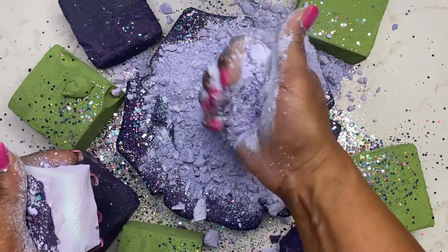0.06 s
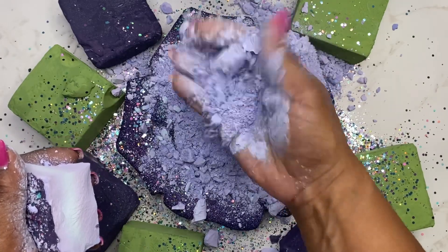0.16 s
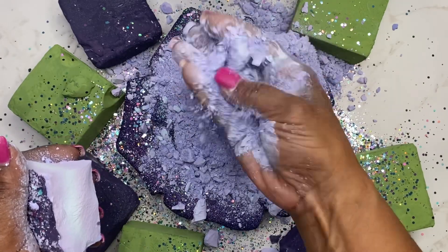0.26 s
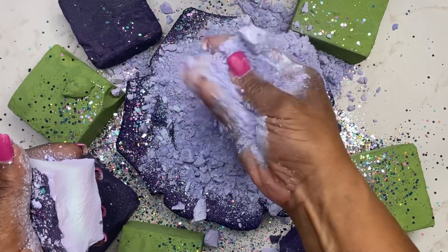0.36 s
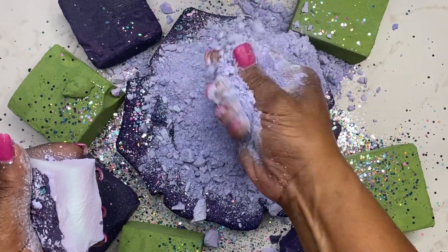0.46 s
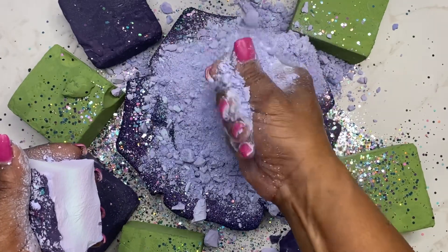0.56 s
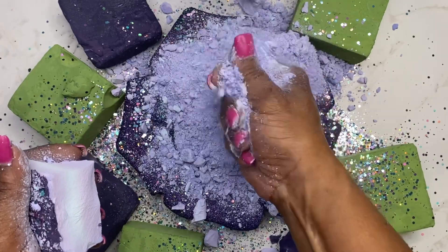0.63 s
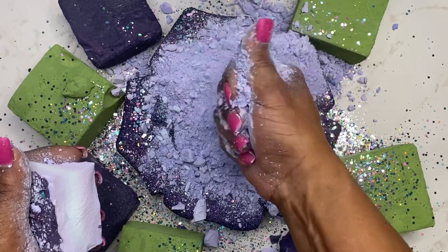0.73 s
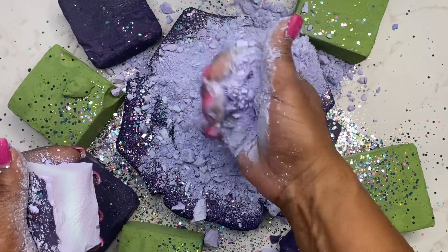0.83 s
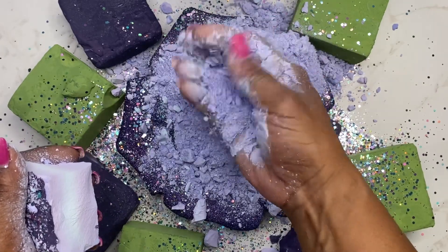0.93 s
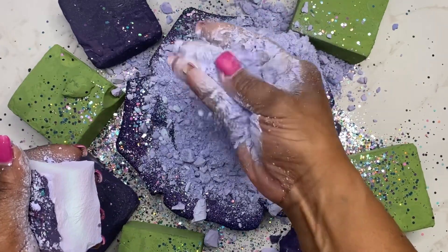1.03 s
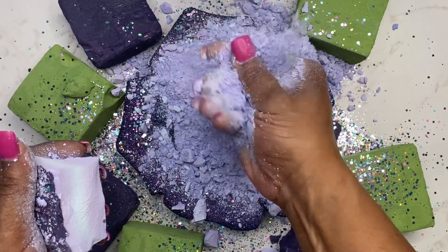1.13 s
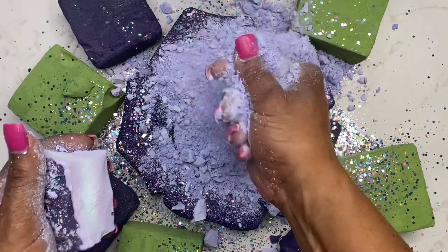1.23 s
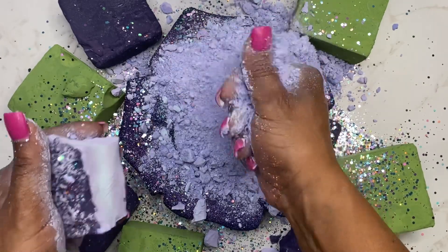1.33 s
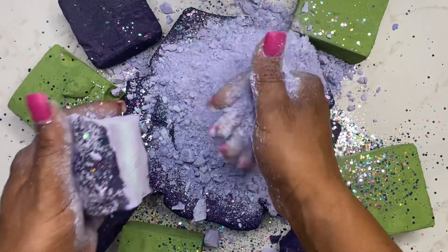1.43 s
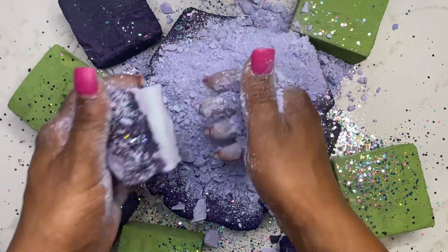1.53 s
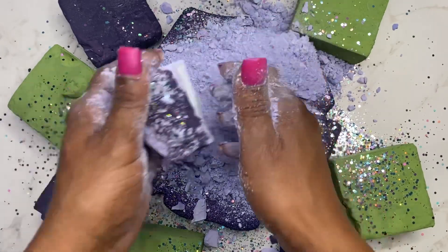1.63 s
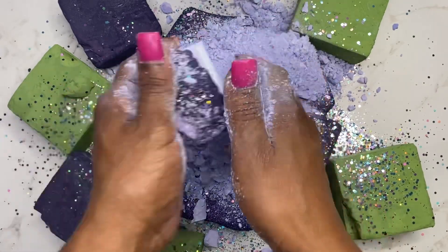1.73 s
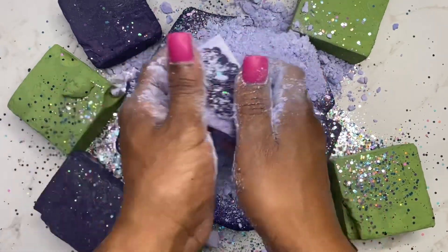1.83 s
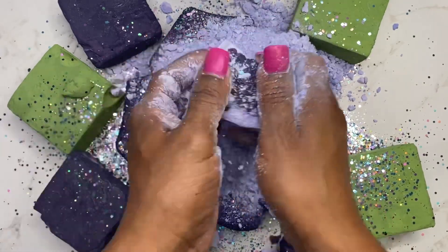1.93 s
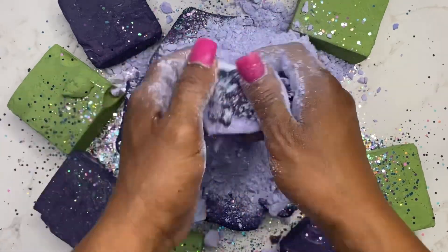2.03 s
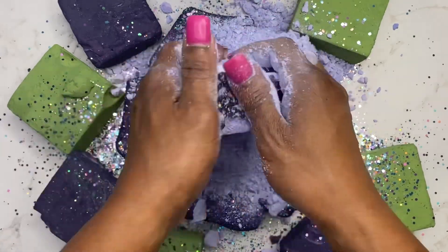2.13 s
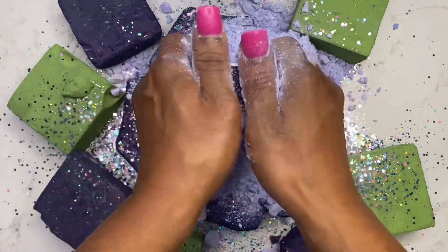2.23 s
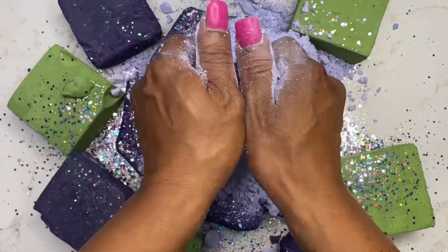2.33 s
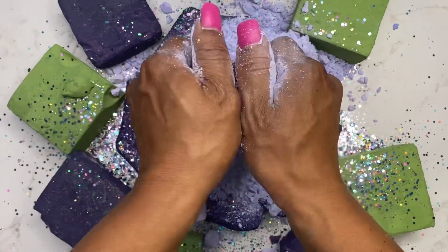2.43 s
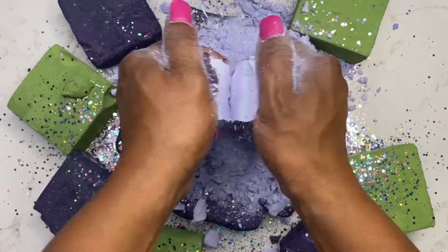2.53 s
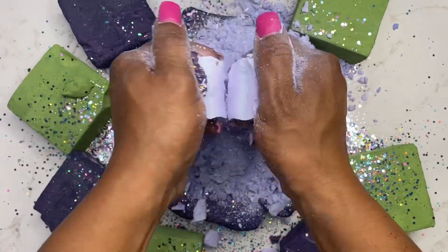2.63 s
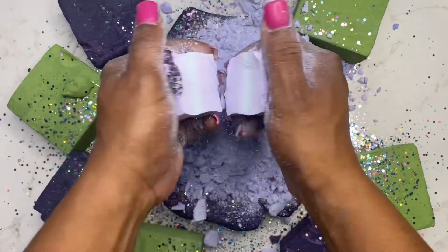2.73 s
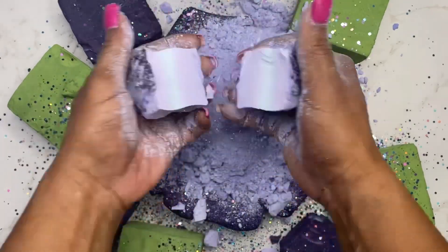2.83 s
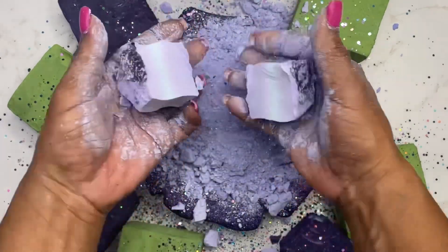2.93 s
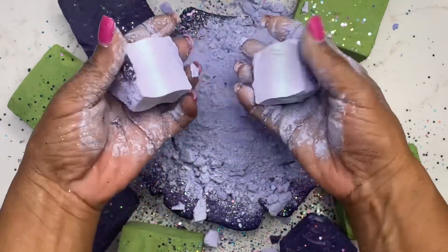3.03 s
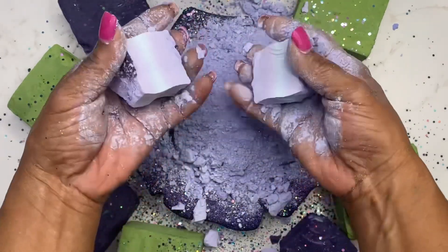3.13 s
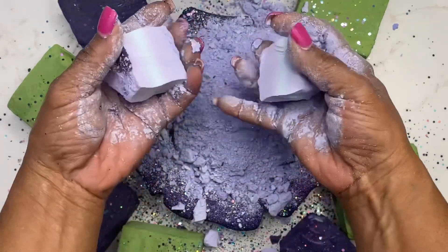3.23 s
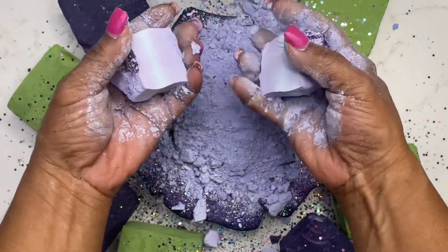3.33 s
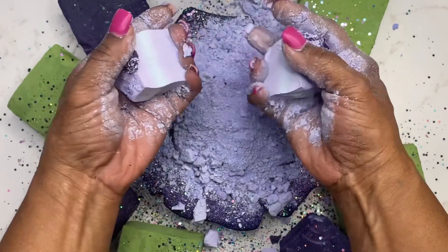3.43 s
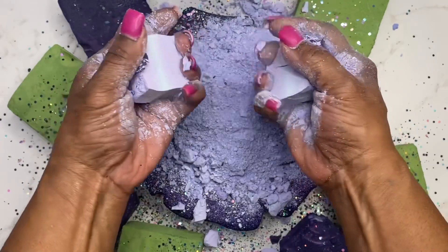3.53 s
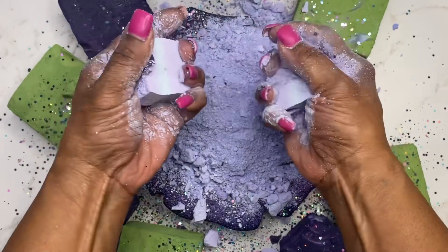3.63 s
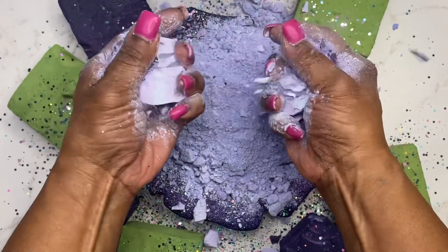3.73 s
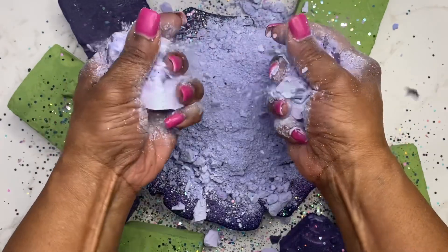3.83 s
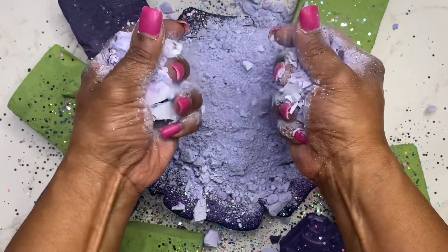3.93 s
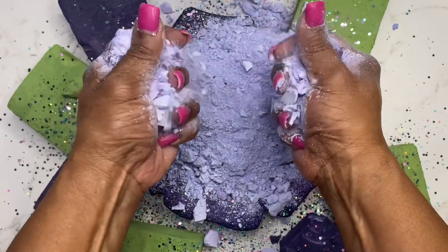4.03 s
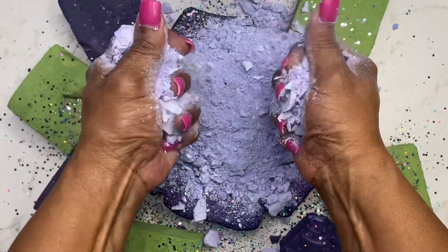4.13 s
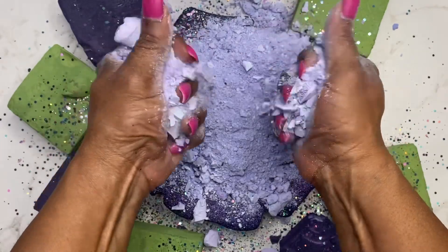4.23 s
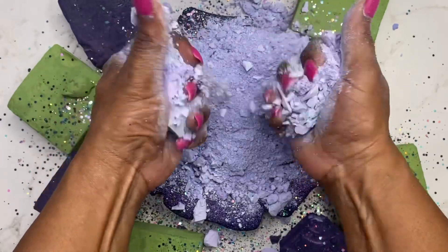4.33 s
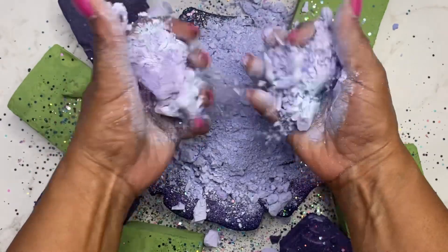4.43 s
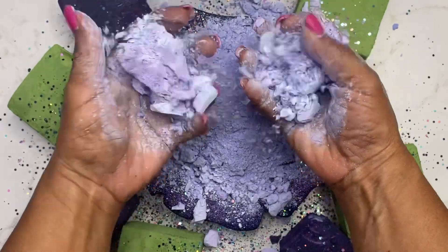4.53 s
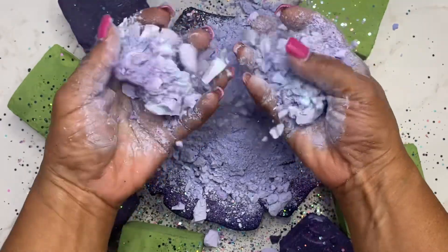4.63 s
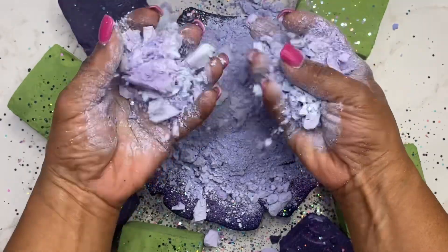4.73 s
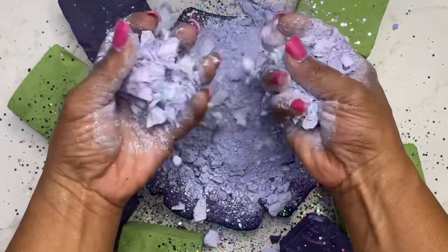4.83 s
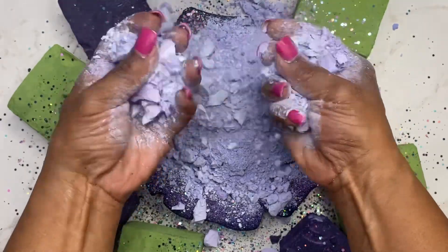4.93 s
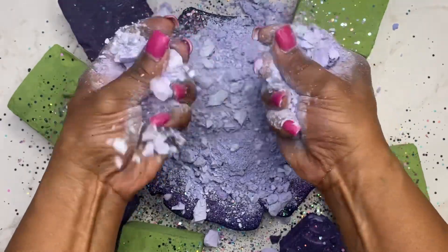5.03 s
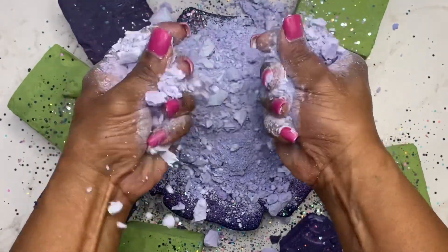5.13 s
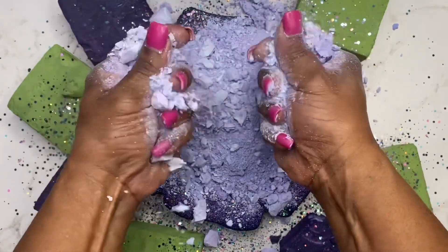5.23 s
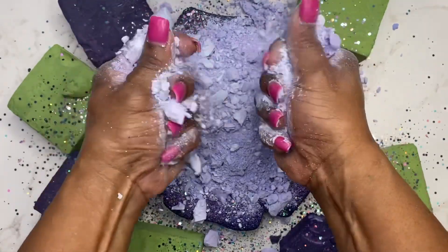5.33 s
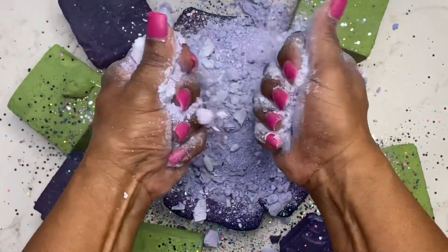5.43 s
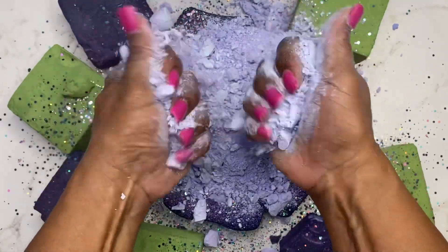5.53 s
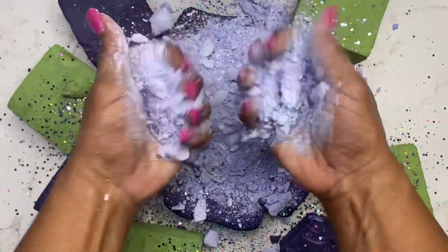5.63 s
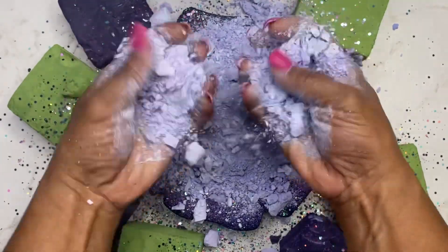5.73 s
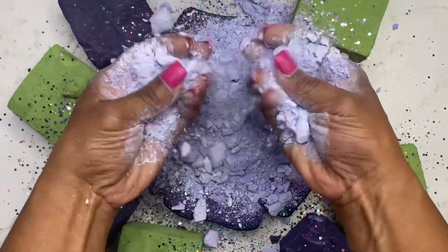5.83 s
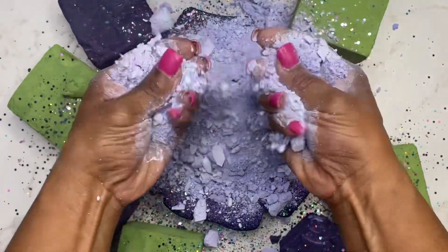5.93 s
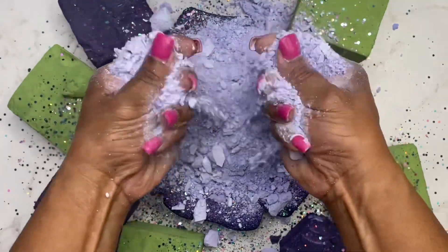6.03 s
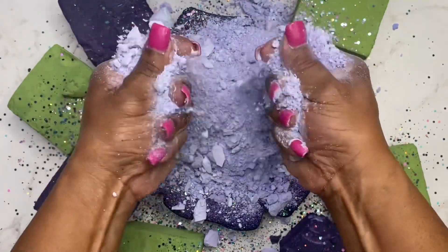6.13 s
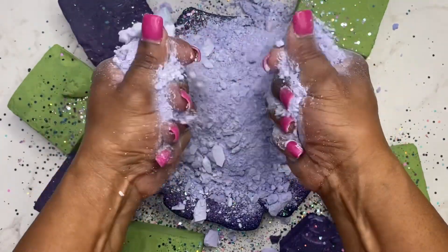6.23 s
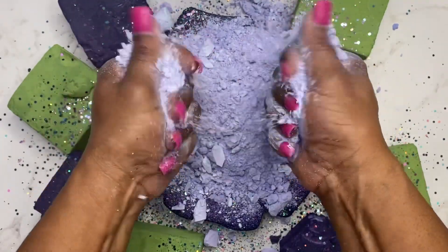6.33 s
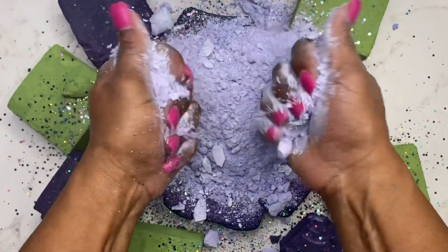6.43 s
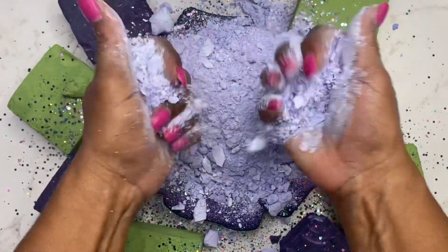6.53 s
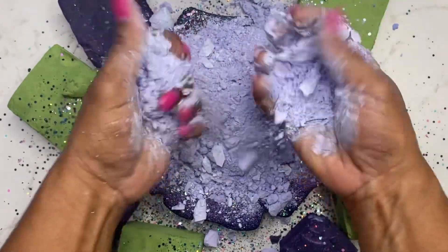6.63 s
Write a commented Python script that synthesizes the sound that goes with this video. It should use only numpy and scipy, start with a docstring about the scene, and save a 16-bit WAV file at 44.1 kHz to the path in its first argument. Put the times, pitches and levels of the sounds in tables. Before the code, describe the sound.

Hands crush dry chalk very close to the microphone in a small quiet room with faint steady hush. Soft gritty squeezes and small cracks come first, then dry skin rubs a block with bright scrapes. It snaps sharply in two, followed by quieter sliding and flaking ticks. A violent volley of cracks and muffled palm thumps follows, loosening into crumbly grinding.

```python
"""Crushing dry chalk

Two hands crush blocks of dry chalk close to the microphone in a small room, over a steady hush.
Crumbs crunch as clumped, ringing grains; a rubbed block sings through resonances and snaps in two.
Both halves then collapse in a volley of cracks, each a dying avalanche of tiny breaks.
Thuds are decaying sines, kneading is more grains; the loudest cracks overload and clip."""
import sys
import numpy as np
from scipy import signal
from scipy.fft import rfft, irfft
from scipy.io import wavfile
from scipy.ndimage import uniform_filter1d

SR = 44100
rng = np.random.default_rng(int(sys.argv[2]) if len(sys.argv) > 2 else 0)


def transcribe(u):
    """Save the signal u as a 16-bit wav file named by the first command-line argument.

    u: samples, shape (n,) or (channels, n), limited to [-1, 1]; the rate is SR.
    q: integer samples, one column per channel.
    """
    v = np.clip(np.atleast_2d(u).T, -1, 1)
    q = np.round(v * 32767).astype(np.int16)
    wavfile.write(sys.argv[1], SR, q)


N = 294147


def from_db(db):
    """Decibels to gain."""
    return 10 ** (np.asarray(db) / 20)


def rms_one(x):
    """Scale to unit rms."""
    return x / np.sqrt(np.mean(x ** 2) + 1e-20)


def fade(size, t60):
    """Exponential decay, 60 dB down after t60 seconds."""
    return np.exp(-np.log(1000) * np.arange(size) / (t60 * SR))


def drift(rate):
    """Slow random wander: straight lines between normal random points, rate points per second."""
    points = rng.standard_normal(N // 20)
    return np.interp(np.arange(N) * rate / SR, np.arange(len(points)), points)


def colour(x, spectrum, size=4096):
    """Causal (minimum-phase) filter that follows (Hz, dB) points."""
    hz, db = np.transpose(spectrum)
    grid = np.maximum(np.fft.rfftfreq(size, 1 / SR), 1)
    curve_db = np.interp(np.log(grid), np.log(hz), db)
    # folding the cepstrum forward in time gives minimum phase
    cepstrum = irfft(np.log(from_db(curve_db)))
    cepstrum[1:size // 2] *= 2
    cepstrum[size // 2 + 1:] = 0
    impulse = irfft(np.exp(rfft(cepstrum)))
    return signal.fftconvolve(x, impulse)[:len(x)]


def resonate(x, hz, q):
    """One resonance with gain 1 at its peak."""
    hz = min(hz, SR / 3)
    w = 2 * np.pi * hz / SR
    damp = np.sin(w) / (2 * q)
    return signal.lfilter([damp, 0, -damp], [1 + damp, -2 * np.cos(w), 1 - damp], x + 1e-18)


def add(track, s, sound):
    """Mix a sound into the track at time s."""
    at = max(round(s * SR), 0)
    track[at:at + len(sound)] += sound[:max(N - at, 0)]


def rings(table):
    """Each row is one dying vibration: low and soft for flesh and powder, high and clear for a chip."""
    out, t = np.zeros(N), np.arange(SR // 2) / SR
    for s, db, hz, t60 in table:
        add(out, s, from_db(db) * np.sin(2 * np.pi * hz * t) * fade(len(t), t60))
    return out


def gestures(rows, attack_s, release_db_per_s):
    """Each movement of the hand swells, holds its level and dies away."""
    t, power = np.arange(N) / SR, np.zeros(N)
    for s, length, db in rows:
        swell = np.clip((t - s) / attack_s, 0, 1)
        held_db = db - release_db_per_s * np.maximum(t - s - length, 0)
        power += (swell * from_db(held_db)) ** 2
    return np.sqrt(power)


# Tone of the quiet room. Each row: frequency in Hz, relative level in dB per Hz.
HUSH_COLOUR = [(30, 3.5), (300, -3), (4000, -29.5), (15500, -42)]


def room_hush(level_db=-42):
    """Steady noise of the room, weighted towards the bass."""
    return from_db(level_db) * rms_one(colour(rng.standard_normal(N), HUSH_COLOUR))


# Tone of the room's echo. Each row: frequency in Hz, echo level in dB.
ECHO_COLOUR = [(100, -24), (400, -15), (700, -22.5), (1100, -14), (1800, -20), (3500, -18.5), (15000, -18)]


def room(x, first_echo_s=0.0028, soft_above_hz=2600, low_t60_s=0.34, treble_t60_s=0.23):
    """Diffuse echoes as decaying coloured noise; the treble dies sooner."""
    noise = rng.standard_normal(SR // 2)
    low = signal.lfilter(*signal.butter(2, soft_above_hz, fs=SR), noise)
    high = signal.lfilter(*signal.butter(2, soft_above_hz, "high", fs=SR), noise)
    # opposite signs avoid a notch where the bands meet
    tail = low * fade(len(noise), low_t60_s) - high * fade(len(noise), treble_t60_s)
    tail *= np.arange(len(tail)) > first_echo_s * SR
    echo = colour(tail / np.linalg.norm(tail), ECHO_COLOUR)
    return signal.fftconvolve(x, echo)[:N]


# Rumble of the moving hands. Each row: frequency in Hz, relative level in dB per Hz.
HANDLING_COLOUR = [(20, -4.5), (65, 0.5), (130, -4), (700, -32)]


def handling(effort, level_db=-32, firm_effort_db=-33.5, follows=0.51,
             lumpy_db=7.0, flesh_db=-12, flesh_hz=210, flesh_q=0.95):
    """The working hands make a lumpy rumble that grows with their effort; the palms add muffled bumps."""
    rumble = colour(rng.standard_normal(N), HANDLING_COLOUR) * from_db(lumpy_db * np.tanh(drift(25)))
    bumps = rng.standard_normal(N) * from_db(lumpy_db * np.tanh(drift(60)))
    for _ in range(2):
        bumps = resonate(bumps, flesh_hz, flesh_q)
    # follows: the share of the effort's swing in dB that the rumble takes on
    gain = from_db(level_db) * (effort / from_db(firm_effort_db)) ** follows
    return gain * (rms_one(rumble) + from_db(flesh_db) * rms_one(bumps))


# Heavy jolts, the snap of the block first. Each row: start in seconds, level in dB before the mode level.
JOLTS = [(2.442, -16.5), (4.411, -18.5)]
# Modes of the things on the table. Each row: frequency in Hz, level in dB relative to the jolt.
NEARBY_MODES = [(412, 4.5), (460, 0.5), (690, -3.5), (937, 5.5), (1200, 1), (1322, 11), (1700, -3),
                (1885, 7), (2028, -15)]


def nearby(mode_t60_s=0.071, rattle_db=-5, low_hz=450, high_hz=720, rattle_t60_s=0.6):
    """The snap and the heaviest falling lump ring the things on the table; the snap adds a dense rattle."""
    out = rings([(s, db + mode_db, hz, mode_t60_s) for s, db in JOLTS for hz, mode_db in NEARBY_MODES])
    band = signal.butter(2, [low_hz, high_hz], "band", fs=SR, output="sos")
    rattle = rms_one(signal.sosfilt(band, rng.standard_normal(SR // 2)))
    s, db = JOLTS[0]   # only the snap is hard enough to start the rattle
    add(out, s, from_db(db + rattle_db) * rattle * fade(len(rattle), rattle_t60_s))
    return out


# Fingers thump into the palm as chalk gives way. Each row: start in seconds, level in dB before the mode level.
THUMPS = [(1.785, -20), (2.442, -5), (3.481, -7.5), (3.518, -1), (3.614, 7.5), (3.695, -5.5), (3.86, -6.5),
          (3.951, 4)]
# Modes of a thumped palm. Each row: frequency in Hz, relative level in dB, T60 in seconds.
PALM_MODES = [(108, 1, 0.037), (190.5, -5.5, 0.034), (375, -7, 0.019)]
# Lumps drop onto the heap of powder. Each row: start in seconds, level in dB before the mode level.
DROPS = [(0.681, -23.5), (4.421, -7), (4.564, -18.5)]
# Modes of the heap on its table. Each row: frequency in Hz, relative level in dB, T60 in seconds.
HEAP_MODES = [(75, -10.5, 0.29), (206, -7, 0.2), (235, -1.5, 0.19)]


def thuds():
    """Dull knocks of the palms and of lumps landing on the heap, each a few low dying modes."""
    out = np.zeros(N)
    for blows, modes in ((THUMPS, PALM_MODES), (DROPS, HEAP_MODES)):
        out += rings([(s, db + mode_db, hz, t60) for s, db in blows for hz, mode_db, t60 in modes])
    return out


def grains(per_s, spread_db, clump_db, clump_rate, q, count=14, size=3000):
    """Grains of all sizes break in clumps, each with a brief ring at one of count pitches; steady rms near 1."""
    born = rng.random(N) < per_s / SR
    size_db = spread_db * np.minimum(rng.exponential(1, N), 4)
    clumps_db = clump_db * np.tanh(drift(clump_rate))
    clicks = born * from_db(size_db + clumps_db) * rng.choice([-1, 1], N)
    dealt = rng.integers(0, count, N)
    pitches = np.geomspace(300, 12000, count)
    sound = sum(resonate(clicks * (dealt == k), hz, q) / np.sqrt(hz) for k, hz in enumerate(pitches))
    sound = signal.lfilter([1, -.8], [1], sound)   # brittle grains radiate mostly treble
    return sound / np.sqrt(uniform_filter1d(sound ** 2, size) + 1e-12)


# Skin slides over the block and its halves. Each row: start in seconds, length in seconds, level in dB.
STROKES = [(1.395, 0.19, -44), (1.765, 0.036, -37.5), (1.835, 0.053, -29), (1.96, 0.13, -40.5),
           (2.1, 0.11, -39), (2.68, 0.1, -41), (2.83, 0.23, -43), (3.0, 0.25, -43), (3.31, 0.19, -35)]


def sliding():
    """How strongly the skin rubs: quick strokes that stop short."""
    return gestures(STROKES, attack_s=0.0046, release_db_per_s=302)


# Tone of skin on chalk. Each row: frequency in Hz, relative level in dB per Hz.
RUB_COLOUR = [(500, -5), (4000, -16), (6000, -5), (10500, -10), (15500, -9.5)]


def rubbing(slide, gain_db=5.0, whole_hz=5900, half_hz=7150, q=2.3, sing=2.9):
    """Dry skin catches on the fine pores and makes the chalk sing; the halves sing higher than the block."""
    t = np.arange(N) / SR
    pores = colour(grains(per_s=6500, spread_db=6.5, clump_db=10.5, clump_rate=56, q=1.2), RUB_COLOUR)
    snap_s = JOLTS[0][0]
    singing = np.where(t < snap_s, resonate(pores, whole_hz, q), resonate(pores, half_hz, q))
    return from_db(gain_db) * slide * rms_one(pores + sing * singing)


# Fingers close on the chalk, hold and let go. Each row: start in seconds, length in seconds, level in dB.
SQUEEZES = [(0.215, 0.2, -38), (0.46, 0.21, -40.5), (0.94, 0.14, -39.5), (1.22, 0.021, -36),
            (1.8, 0.11, -40.5), (2.08, 0.12, -39.5), (2.34, 0.07, -39.5), (2.58, 0.15, -42.5),
            (3.35, 0.13, -36), (3.48, 0.076, -27.5), (3.61, 0.16, -23), (3.8, 0.17, -27.5),
            (4.0, 0.2, -32.5), (4.31, 0.01, -33), (4.43, 0.22, -34.5), (4.68, 0.36, -31),
            (5.1, 0.37, -31.5), (5.56, 0.38, -39), (5.79, 0.19, -31), (6.0, 0.25, -38.5), (6.24, 0.12, -35)]


def squeezing(loose_before_db=-51, loose_after_db=-41.5, looser_from_s=3.2):
    """How hard the crumbs are ground: squeezes over the shifting of loose crumbs, which grows at one point."""
    loose = from_db(np.where(np.arange(N) / SR < looser_from_s, loose_before_db, loose_after_db))
    return np.hypot(gestures(SQUEEZES, attack_s=0.015, release_db_per_s=132), loose)


# Tone of ground crumbs. Each row: frequency in Hz, relative level in dB per Hz.
CRUMB_COLOUR = [(100, 4), (400, 3.5), (1100, 3), (2400, 4), (4300, -7), (7000, -3), (10000, -13),
                (15500, -17.5)]


def crumbs(grip, grit_db=2.0, powder_db=0.0, firm_grip_db=-31, grit_growth=0.13, powder_top_hz=8000):
    """Coarse grit crackles over the soft crunch of the powder, the more so the harder the grip."""
    grit = grains(per_s=450, spread_db=5.5, clump_db=8.5, clump_rate=51, q=1.56)
    powder = grains(per_s=6000, spread_db=1.0, clump_db=6.0, clump_rate=150, q=1.4)
    powder = signal.lfilter(*signal.butter(2, powder_top_hz, fs=SR), powder)
    grit_gain = from_db(grit_db) * (grip / from_db(firm_grip_db)) ** grit_growth
    grit = grit_gain * rms_one(colour(grit, CRUMB_COLOUR))
    powder = from_db(powder_db) * rms_one(colour(powder, CRUMB_COLOUR))
    return grip * (grit + powder)


def crack(hz, t60, lead=4.55, uneven_db=9.5, q=0.79, ring_db=-3, ring_q=4.6, edge_db=-20,
          palm_db=-4, palm_hz=330, size=3072):
    """A first break sets off a dying avalanche of tiny ones; the fragment rings for a few cycles."""
    sizes = from_db(uneven_db * rng.uniform(-2.0, 2.14, size))
    breaks = rms_one(rng.standard_normal(size) * sizes) * fade(size, t60)
    breaks[0] = lead * rng.choice([-1, 1])
    body = resonate(breaks, hz, q)
    ring = sum(resonate(breaks, hz * 2 ** octave, ring_q) for octave in rng.uniform(-0.66, 0.2, 2))
    hollow = resonate(breaks, palm_hz, 0.55)   # the cupped hand adds a dull pop
    sound = body + from_db(ring_db) * ring + from_db(edge_db) * breaks + from_db(palm_db) * hollow
    # same energy as one millisecond at rms 1
    return sound * np.sqrt(SR / 1000 / np.sum(sound ** 2))


def crumb_snaps(grip, per_s=14, above_grip_db=13, spread_db=3.0, hz=3800, octaves=0.8, t60=0.0042):
    """Larger crumbs burst at uneven intervals, the louder the harder the grip."""
    out = np.zeros(N)
    for k, (when, size, pitch) in enumerate(rng.uniform(-0.89, 1, (200, 3))):
        s = (k + 0.5 + 0.5 * when) / per_s
        snap = from_db(above_grip_db + spread_db * size) * crack(hz * 2 ** (octaves * pitch), t60, size=512)
        if s < N / SR:
            add(out, s, grip[int(s * SR)] * snap)
    return out


# Hard chips spring free and ring. Each row: start in seconds, level in dB, pitch in Hz, T60 in seconds.
CHIPS = [(1.399, -13.5, 5320, 0.0085), (4.683, -11, 3600, 0.047), (4.684, -9.5, 2880, 0.044),
         (5.861, -12.5, 3690, 0.038)]


def chips():
    """Small hard chips, each vibrating briefly as a clear dying sine."""
    return rings(CHIPS)


# The smooth face flakes under the fingertips. Each row: start in seconds, strength in dB, T60 in ms.
FLAKES = [(1.4877, -19, 21), (1.862, -17, 8), (1.8789, -24, 2.8), (2.0556, -21, 2), (2.154, -17, 18),
          (2.967, -18, 7.9), (3.0045, -2.5, 36), (3.0442, -11, 13), (3.0768, -11.5, 20), (3.116, -17, 5.5),
          (3.1615, -11, 180), (3.249, -19, 5.9), (3.3185, -11, 18), (3.348, -9, 7.6), (3.3616, -7.5, 5.6),
          (3.3999, -11, 3.7), (3.416, -8, 24), (3.4536, 0, 2.1)]


def flakes(tick_hz=8000):
    """Thin flakes break off the face, all as bright cracks of the same pitch."""
    out = np.zeros(N)
    for s, db, ms in FLAKES:
        add(out, s, from_db(db) * crack(tick_hz, ms / 1000))
    return out


# Pieces of chalk break. Each row: start in seconds, strength in dB, pitch in Hz, T60 in ms.
CRACKS = [(0.2227, -23.5, 6650, 5.6), (0.3466, -17, 1930, 1.9), (0.3641, 0, 1540, 2.5),
          (0.4704, -11, 2550, 21), (0.628, -15, 1960, 2.2), (0.6431, -11, 4400, 15),
          (0.7191, -19, 4450, 1.2), (1.1004, -16, 3240, 1.8), (1.613, -23.5, 1600, 3.4),
          (2.2953, -13, 2550, 13), (2.3874, -7, 2920, 15), (2.434, -21, 2540, 6.6), (2.4403, 14, 1600, 9.1),
          (2.442, 16, 610, 8.7), (2.46, -11.5, 2480, 32), (2.592, -14.5, 2060, 33), (3.483, 8, 890, 8.6),
          (3.5162, 18.5, 2530, 19), (3.5337, 1, 3010, 54), (3.5488, 11, 3300, 4.9), (3.61, 4, 1350, 24),
          (3.619, 16.5, 3000, 5.4), (3.6297, 4, 2370, 4.2), (3.6488, 4.5, 4370, 68), (3.6676, 3, 3270, 13),
          (3.675, 5, 2480, 22), (3.693, 4, 2980, 20), (3.7327, 2.5, 2900, 13), (3.7732, 6.5, 3530, 5.5),
          (3.8076, 15, 3030, 10), (3.859, 4.5, 1600, 38), (3.92, 3.5, 6300, 66), (3.9368, 13.5, 6900, 10),
          (3.9492, 9, 3100, 35), (4.1711, 3, 6600, 3.8), (4.4093, 8, 1420, 11.4), (4.536, -14.5, 2520, 9.8),
          (4.682, 0.5, 4100, 16), (4.881, -10.5, 2450, 110), (4.7722, -13.5, 1710, 8.4),
          (4.7803, -0.5, 2570, 4.3), (5.3035, -5, 5600, 2.1), (5.3793, -1, 4560, 1.6),
          (5.6567, -10, 740, 22), (5.922, -12, 1240, 1.2), (6.064, -9, 1070, 3.9),
          (6.2831, -11.5, 1520, 28), (6.331, -9.5, 760, 45)]


def fractures():
    """The distinct cracks of breaking pieces, from a crumb to the snap of the block."""
    out = np.zeros(N)
    for s, db, hz, ms in CRACKS:
        add(out, s, from_db(db) * crack(hz, ms / 1000))
    return out


def scene():
    """The chalk close by with its echo, the rumble of the hands and the steady hush of the room."""
    grip, slide = squeezing(), sliding()
    ground = crumbs(grip) + crumb_snaps(grip)
    broken = fractures() + flakes() + chips()
    chalk = broken + ground + rubbing(slide) + thuds() + nearby()
    mix = chalk + room(chalk) + handling(grip + slide) + room_hush()
    return mix[None]   # one channel


def record(dry):
    """The input clips at full scale, then a steep low-pass cuts the top."""
    low_pass = signal.ellip(10, .1, 70, 16000, fs=SR, output="sos")   # ripple dB, stop dB, cutoff Hz
    return signal.sosfilt(low_pass, np.clip(dry, -1, 1))


dry = scene()
out = record(dry)
transcribe(out)
```